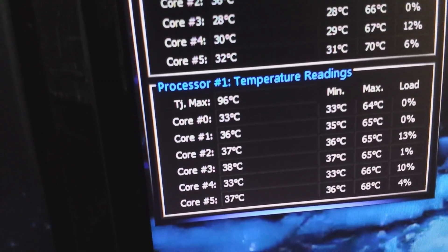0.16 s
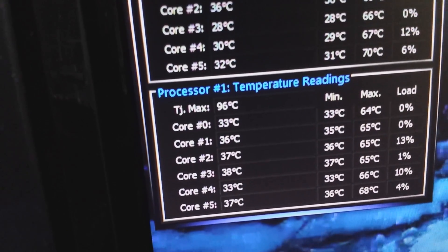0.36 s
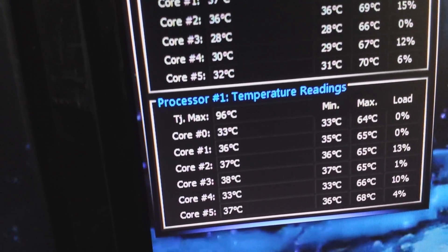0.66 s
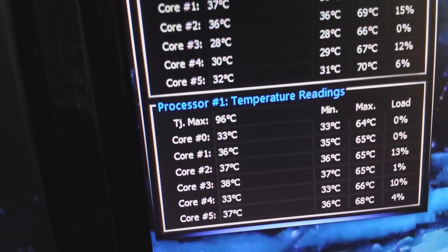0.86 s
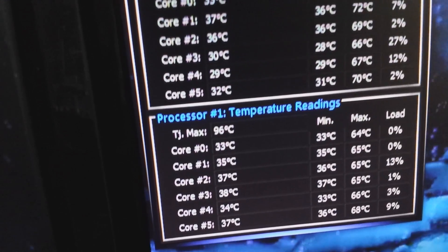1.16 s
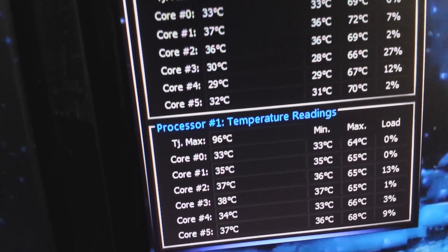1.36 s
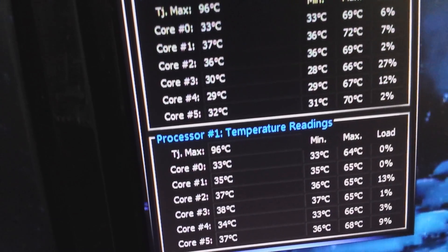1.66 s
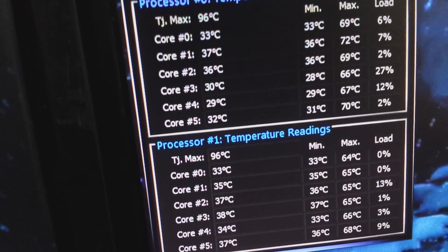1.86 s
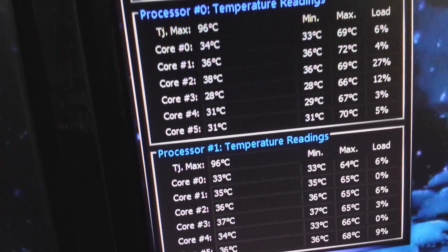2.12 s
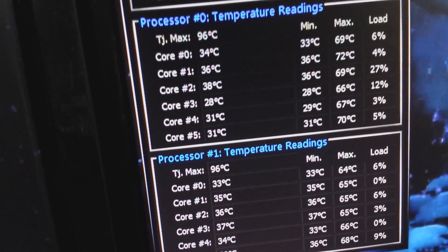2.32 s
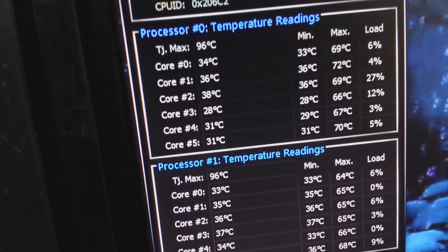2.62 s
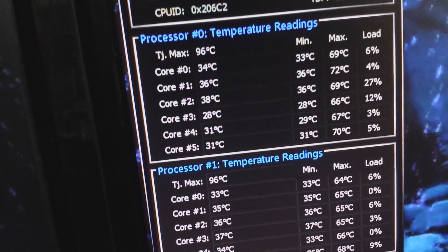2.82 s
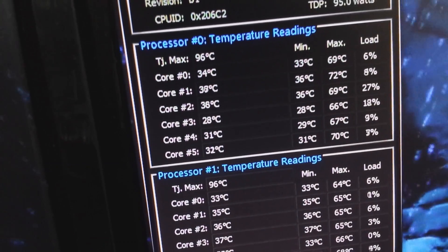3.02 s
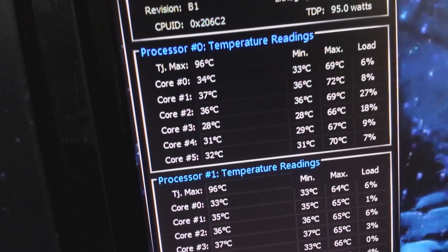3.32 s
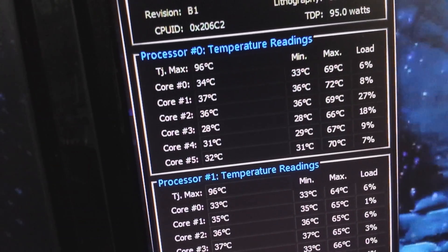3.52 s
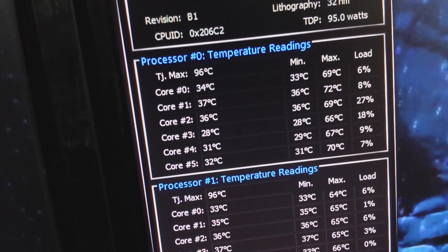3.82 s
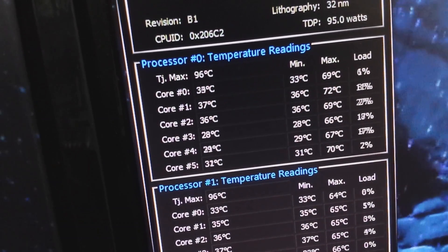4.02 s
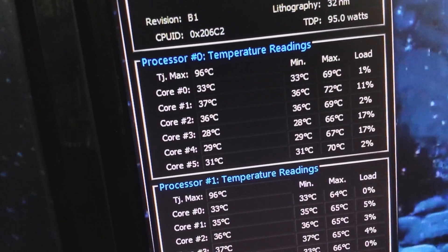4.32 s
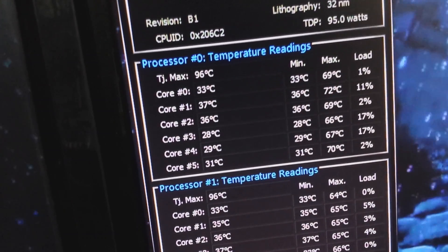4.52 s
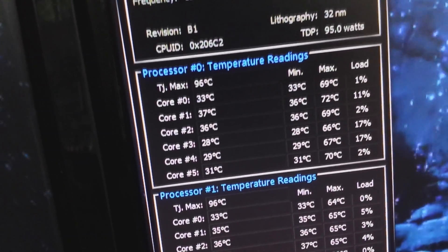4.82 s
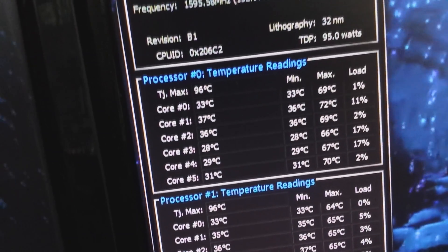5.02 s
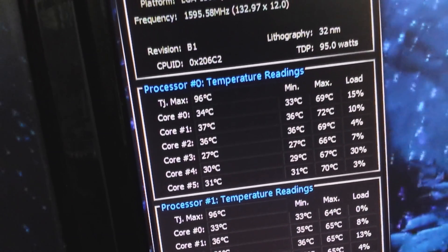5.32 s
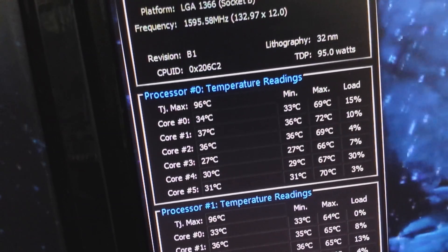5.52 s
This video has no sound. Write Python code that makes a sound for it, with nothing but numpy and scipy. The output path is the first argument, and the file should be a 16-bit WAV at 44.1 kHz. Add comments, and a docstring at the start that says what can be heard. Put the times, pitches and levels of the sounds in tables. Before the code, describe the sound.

Close indoor stereo pickup of a desktop computer with two fans at full speed: a low, throbbing hum, steady drive hum and broad rushing air coloured by the case. A thin, rough electrical whine with hiss stays on the right, cutting out for an instant midway. A hand softly rubs the handheld recorder early and bumps it dully later.

```python
"""Two fans of a desktop computer run at full speed, heard from a hand-held recorder in front of the screen.
Each fan is a set of sines at multiples of its turning speed; they throb against steady hums at nearby pitches.
Air rushes through the resonant case: noise shaped by a smooth spectrum plus resonances.
In the right channel sits a thin, unsteady electrical whine with hiss; its tones drop out once for a moment.
The hand on the recorder makes a soft rub and a dull bump."""
import sys
import numpy as np
from scipy import signal
from scipy.fft import rfft, irfft
from scipy.io import wavfile

SR = 44100
rng = np.random.default_rng(int(sys.argv[2]) if len(sys.argv) > 2 else 0)


def generate_wav(sig):
    """Save sig (samples, or channels by samples) to the path in sys.argv[1] as 16-bit PCM at SR."""
    pcm = np.round(np.clip(np.atleast_2d(sig).T, -1, 1) * 32767).astype(np.int16)
    wavfile.write(sys.argv[1], SR, pcm)


N = 250161
TIME = np.arange(N) / SR  # s
FREQ = np.maximum(np.arange(N // 2 + 1) * SR / N, 1)  # Hz

# In all tables, left-right/dB above 0 means louder on the left; base levels get small trims later.
# Fan tones; 4 is the motor's four poles, 7 the seven blades:
# multiple of the turning speed, base level/dB, left-right/dB, left lead/rad
SLOW_FAN_TONES = [(4, -48.5, 1, 0.084), (7, -41.5, -1.6, 0.17), (8, -64.5, -2, -0.05),
                  (20, -67.5, -7, 0.88), (21, -68, -1, 0.7), (24, -67, -10, 1.4), (28, -84, -9, -.2),
                  (32, -74, 4, -0.023), (35, -72.5, 1, -.6)]
FAST_FAN_TONES = [(4, -45, -4.5, -0.15), (6, -65, 17, 0), (7, -52, -1.5, 0), (14, -71.5, -11, 0)]
# Steady hum of drives and small fans, plus a steady tone near twice the fast fan's turning speed (120.3 Hz):
# f/Hz, level/dB, left-right/dB, left lead/rad
HUM_TONES = [(90.2, -66, -1, 0), (120.3, -58.5, -0.5, 0), (126.3, -50.5, -0.5, -0.23),
             (191.7, -61.5, 2, .1), (294, -56, -1.5, 0.18), (591, -72.5, -3, -1.8), (1328, -83, -2, 0)]
# Spectrum of the rushing air: f/Hz, base level in each Hz/dB
AIR_SPECTRUM = [(25, -93), (55, -80.5), (95, -80.5), (200, -78), (320, -77.5), (480, -80), (600, -84.5),
                (900, -86), (1750, -91.5), (2500, -90.5), (4500, -95), (6700, -93.5), (9500, -103),
                (14000, -103)]
# Resonances of the case: f/Hz, width/Hz, lift/dB
CASE_RESONANCES = [(126.5, 15, 7.5), (176, 30, 8.5), (244.5, 59.6, 13), (250, 8.8, 2.5), (359.4, 16, 5.5),
                   (400.5, 20, 6), (443.4, 30.5, 6), (691, 91, 4.5), (1175, 150, 3.5), (1450, 110, 2.5),
                   (1887, 23, 5.5), (2112, 130, 5), (2560, 100, 2.5), (3100, 90, 5.5)]
# Air at the two microphones: f/Hz, likeness/0-1, left-right/dB
AIR_AT_MICROPHONES = [(100, 0.92, 3), (190, 1, 0), (257, 1, 1.5), (350, 0.99, -0.5), (460, 0.63, -5.5),
                      (577, 0.35, -0.5), (950, 0, 3.5), (2000, 0, -1.5), (4000, 0.01, 1)]
# The hand shifts its grip: t/s, half length/s, level/dB, f/Hz, half width/Hz
GRIP_SHIFTS = [(1.183, 0.047, -59, 1200, 350), (4.22, .07, -55, 45, 30)]
# Partials of the whine: f/Hz, level/dB, own flutter/Hz
WHINE_PARTIALS = [(4087, -51, 78), (6103, -52.5, 89), (8070, -54, 117.5), (10120, -61.5, 118),
                  (12070, -64.5, 168), (14140, -56.5, 90)]
# Brief chirps of the whine at lower pitches: f/Hz, level at the top of a full-strength chirp/dB
CHIRP_TONES = [(3400, -49.5), (5130, -51)]
# Spectrum of the hiss around the whine: f/Hz, level in each Hz/dB
HISS_SPECTRUM = [(1800, -110), (2600, -99), (3200, -92), (3700, -91.5), (4400, -85.5), (6200, -89),
                 (7150, -92), (8300, -86), (10000, -93.5), (10900, -108), (11500, -106), (12550, -91.5),
                 (13100, -107), (13800, -95.5)]
# Small chance rises in the level of the fast fan's hum: t/s, length/s, rise/dB
FAST_FAN_CHANCE_RISES = [(3.45, 0.28, 3), (4.68, 0.34, 1.5)]
# Brief rise in the level of the rushing air: t/s, length/s, rise/dB
AIR_RISES = [(3.95, 0.51, 1.2)]

# Turning speeds in turns per second; the fast fan steps up a little, halfway there at STEP_UP_AT_S
SLOW_FAN_HZ, FAST_FAN_HZ, STEP_UP_HZ = 33.185, 60.11, 0.205
STEP_UP_AT_S, SPIN_UP_S = 3.2, 0.3
# The fans' tones fade slowly towards the end
FADE_FROM_S, FADE_DB_PER_S = 3.74, 0.5
# The mains hum beats with the fast fan's once-a-turn shake; they oppose most at HUM_LULL_S
MAINS_HZ, MAINS_DB, SHAKE_DB, HUM_LULL_S = 60, -63, -66.5, 3.75
# The whine's tones cut out once; the hiss crackles as they break off
DROPOUT_AT_S, DROPOUT_S, DROPOUT_EDGE_S, DROPOUT_DB = 2.474, 0.042, 0.006, -25
CRACKLE_S, CRACKLE_DB = 0.005, 4
CUTOFF_HZ = 14520  # top of the recorder's range


def from_db(db):
    """Turns decibels into a multiplying gain."""
    return 10 ** (np.asarray(db) / 20)


def over_hz(rows):
    """Reads a table's columns at every frequency, joining its points on a log pitch scale."""
    hz, *columns = np.transpose(rows)
    return [np.interp(np.log(FREQ), np.log(hz), column) for column in columns]


def bell(at, centre, width):
    """A smooth bump of height 1 that has sunk to 0.14 one width from its centre."""
    return np.exp(-2 * ((at - centre) / width) ** 2)


def ramp(start_s, length_s):
    """Rises from 0 to 1 and stays there."""
    return np.clip((TIME - start_s) / length_s, 0, 1)


def brief_rises(rows):
    """Level change in dB that rises smoothly and sinks back at each listed time."""
    return sum(db * bell(TIME, at_s, length_s) for at_s, length_s, db in rows)


def drift(rate):
    """Smooth random wandering around 0 with spread 1; a higher rate (Hz) wanders faster."""
    coarse_time = TIME[::10]  # every 10th sample is enough for slow changes
    bins = rfft(rng.standard_normal(2 ** 15))
    hz = np.linspace(0, SR / 20, len(bins))
    slow = irfft(bins / (1 + (hz / rate) ** 2))[:len(coarse_time)]
    return np.interp(TIME, coarse_time, (slow - slow.mean()) / slow.std())


def noise_bins(density_db):
    """Spectrum of a fresh noise with the given level in each Hz."""
    return rfft(rng.standard_normal(N)) * from_db(density_db) * np.sqrt(SR / 2)


def angle(hz):
    """Running phase of something that turns at hz, from a random start."""
    turns = np.cumsum(hz * np.ones(N)) / SR
    return 2 * np.pi * (rng.random() + turns)


def tone(hz, level_db, pan_db, lead, waver_db):
    """A stereo sine whose level wavers in the uneven flow."""
    side = np.array([[0.5], [-0.5]])  # left, right
    gain = np.sqrt(2) * from_db(level_db + pan_db * side + waver_db * drift(3.3))
    return gain * np.sin(angle(hz) + lead * side)


def handling():
    """A soft rub and a dull bump on the recorder's body: short bursts of band-limited noise."""
    out = np.zeros(N)
    for at_s, half_length_s, db, hz, half_width_hz in GRIP_SHIFTS:
        rub = irfft(noise_bins(0) * bell(FREQ, hz, 2 * half_width_hz), N)
        burst = bell(TIME, at_s, 2 * half_length_s)
        out += from_db(db) * burst * rub / rub.std()
    return out


def chirps(per_s=22, length_s=0.0028, spread_hz=70):
    """Tiny tone bursts at random moments, each of its own strength."""
    starts = (rng.random(N) < per_s / SR) * rng.uniform(0.39, 1, N)
    burst_shape = bell(np.arange(-SR // 50, SR // 50) / SR, 0, length_s)
    bursts = signal.fftconvolve(starts, burst_shape, "same")
    tones = 0
    for hz, db in CHIRP_TONES:
        wandering_hz = hz + spread_hz * drift(102)
        tones = tones + np.sqrt(2) * from_db(db) * np.sin(angle(wandering_hz))
    return bursts * tones


def whine(pitch_hz=2038, jitter=0.0048, sag=0.004, rough_db=1.5, pulsing=0.56):
    """An unsteady electrical oscillation: its partials jitter together, and hiss spurts each cycle."""
    cut_out = ramp(DROPOUT_AT_S, DROPOUT_EDGE_S) - ramp(DROPOUT_AT_S + DROPOUT_S, DROPOUT_EDGE_S)
    crackle_db = CRACKLE_DB * bell(TIME, DROPOUT_AT_S, CRACKLE_S)
    # the pitch sinks slightly from start to end
    pace = 1 + jitter * drift(74) + sag * (0.5 - TIME / TIME[-1])
    tones = chirps()
    for hz, db, flutter_hz in WHINE_PARTIALS:
        gain = np.sqrt(2) * from_db(db + rough_db * drift(130))
        tones = tones + gain * np.sin(angle(hz * pace + flutter_hz * drift(377)))
    spurts = np.sqrt(1 + pulsing * np.cos(angle(pitch_hz * pace)))
    steady_hiss = irfft(noise_bins(over_hz(HISS_SPECTRUM)[0]), N)
    hiss = steady_hiss * spurts * from_db(2.05 * drift(160))
    return from_db(DROPOUT_DB * cut_out) * tones + from_db(crackle_db) * hiss


def air(change_db, level_db=0.56, change_above_hz=600):
    """Turbulent air coloured by the case: alike on both sides in the bass, diffuse in the treble."""
    case_lift_db = sum(db * bell(FREQ, hz, width) for hz, width, db in CASE_RESONANCES)
    density_db = level_db + over_hz(AIR_SPECTRUM)[0] + case_lift_db
    alike, pan_db = over_hz(AIR_AT_MICROPHONES)
    # mid is shared by both sides, side is opposite in them
    mid = np.sqrt((1 + alike) / 2) * noise_bins(density_db)
    side = np.sqrt((1 - alike) / 2) * noise_bins(density_db)
    bins = np.array([mid + side, mid - side]) * from_db([pan_db / 2, -pan_db / 2])
    # the level change acts mainly on the short waves, which depend on the recorder's position
    upper = FREQ ** 2 / (FREQ ** 2 + change_above_hz ** 2)
    return irfft(bins * (1 - upper), N) + irfft(bins * upper, N) * from_db(change_db)


def hum(fan_speed):
    """Steady tones beat with the fans; the mains hum beats slowest, nearly in step with the fast fan."""
    turns_ahead = np.cumsum(fan_speed - MAINS_HZ) / SR
    apart = 2 * np.pi * (turns_ahead - np.interp(HUM_LULL_S, TIME, turns_ahead))
    # the two partly cancel when apart is a whole turn
    beat = np.abs(from_db(MAINS_DB) - from_db(SHAKE_DB) * np.exp(1j * apart))
    mains = beat * tone(MAINS_HZ, 0, pan_db=0.5, lead=0, waver_db=0.7)
    return mains + sum(tone(hz, db, pan, lead, waver_db=1.0) for hz, db, pan, lead in HUM_TONES)


def fan(speed, tones, change_db, waver_db, long_wave_hz=120):
    """Motor poles and blades sound at whole multiples of the turning speed."""
    out = 0
    for multiple, db, pan, lead in tones:
        hz = multiple * speed
        # the longest waves are equally loud wherever the recorder is, so they skip the level change
        share = np.clip(hz / long_wave_hz - 1, 0, 1)
        out = out + tone(hz, db + share * change_db, pan, lead, waver_db)
    return out


def scene(slow_db=-0.07, fast_db=-0.5, rush_db=-1.0):
    """The computer in both channels, the whine in the right one."""
    right_only = np.array([np.zeros(N), whine()])
    rush = air(rush_db + brief_rises(AIR_RISES))
    fast_speed = FAST_FAN_HZ + STEP_UP_HZ * ramp(STEP_UP_AT_S - SPIN_UP_S / 2, SPIN_UP_S)
    fade_db = -FADE_DB_PER_S * np.maximum(TIME - FADE_FROM_S, 0)
    slow = fan(SLOW_FAN_HZ, SLOW_FAN_TONES, slow_db + fade_db, waver_db=0.4)
    fast_change_db = fast_db + fade_db + brief_rises(FAST_FAN_CHANCE_RISES)
    fast = fan(fast_speed, FAST_FAN_TONES, fast_change_db, waver_db=0.8)
    return handling() + right_only + rush + hum(fast_speed) + slow + fast


def record(dry):
    """The recorder loses the deepest rumble and cuts the top steeply."""
    low_cut = signal.sosfilt(signal.butter(2, 16, "high", fs=SR, output="sos"), dry)
    return irfft(rfft(low_cut) / np.sqrt(1 + (FREQ / CUTOFF_HZ) ** 1200), N)


dry = scene()
out = record(dry)
generate_wav(out)
```